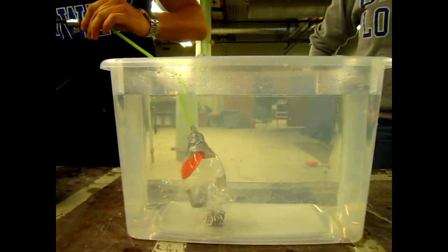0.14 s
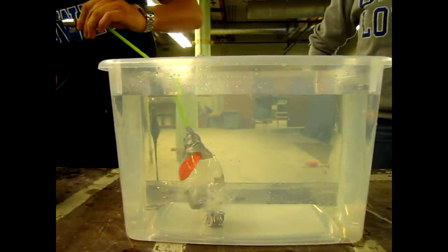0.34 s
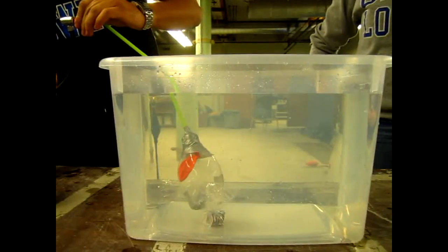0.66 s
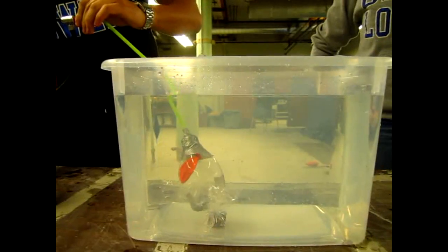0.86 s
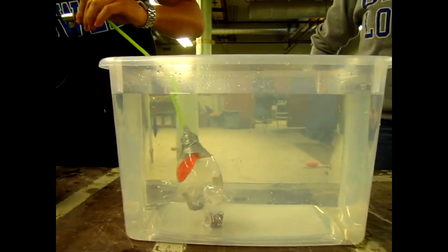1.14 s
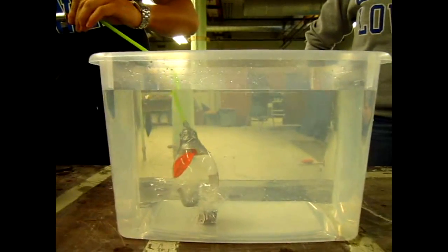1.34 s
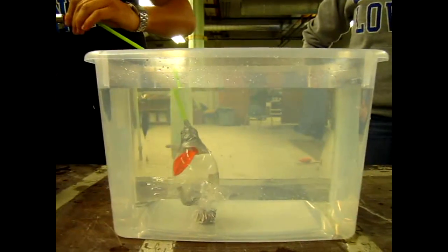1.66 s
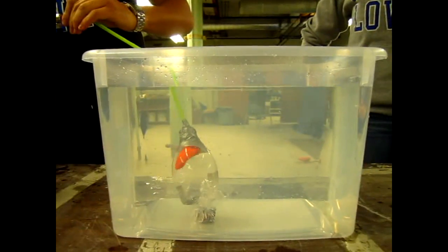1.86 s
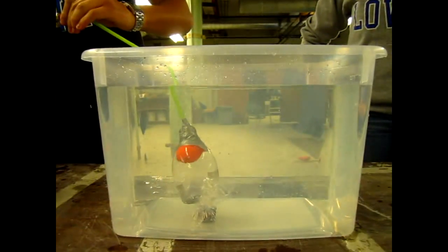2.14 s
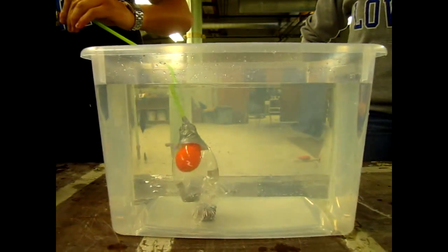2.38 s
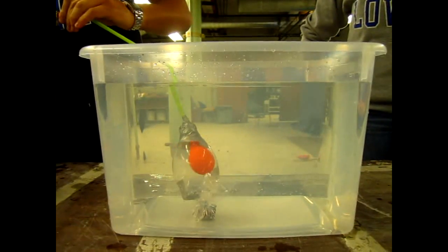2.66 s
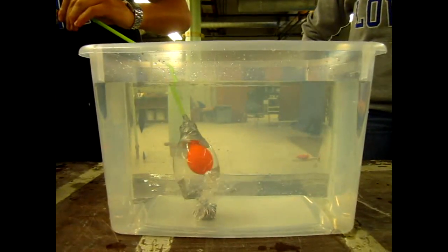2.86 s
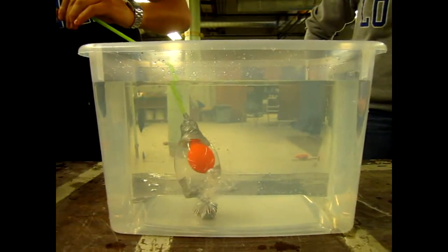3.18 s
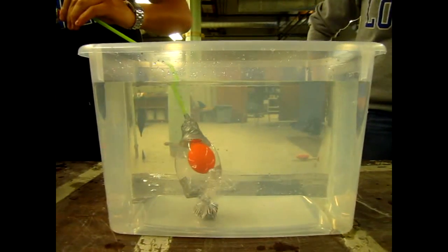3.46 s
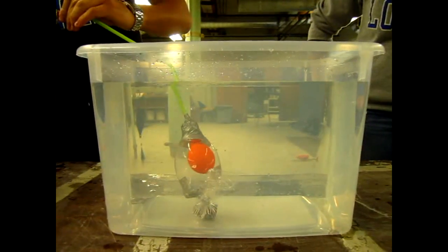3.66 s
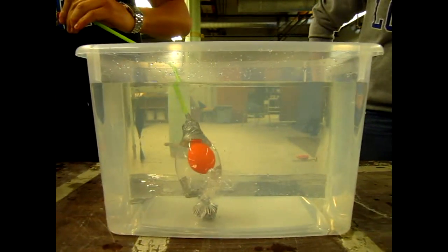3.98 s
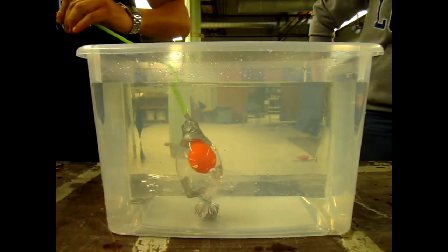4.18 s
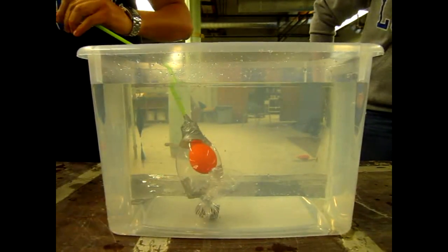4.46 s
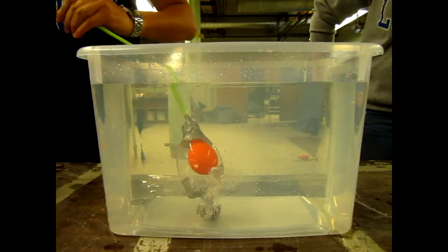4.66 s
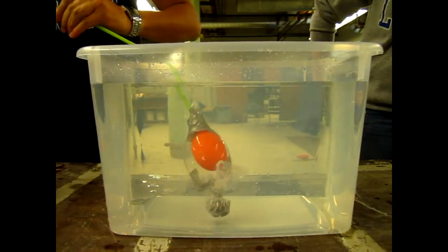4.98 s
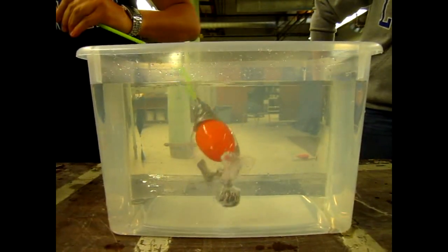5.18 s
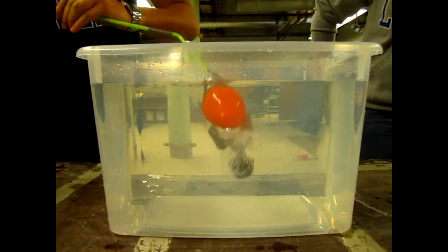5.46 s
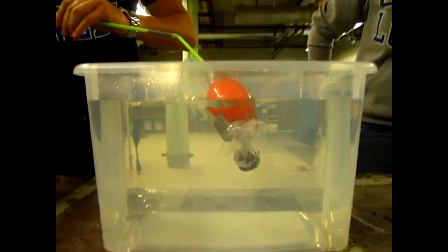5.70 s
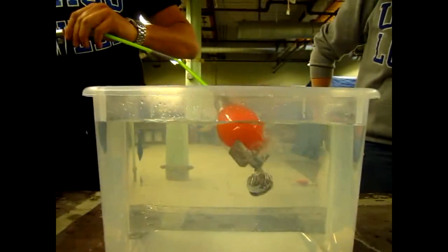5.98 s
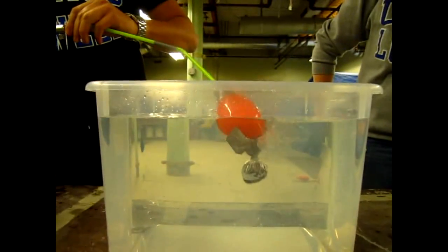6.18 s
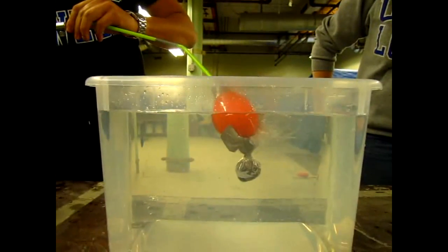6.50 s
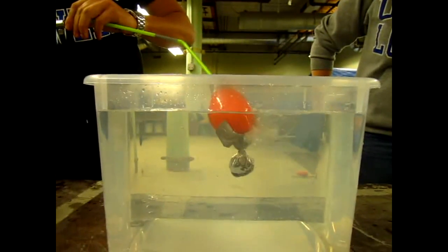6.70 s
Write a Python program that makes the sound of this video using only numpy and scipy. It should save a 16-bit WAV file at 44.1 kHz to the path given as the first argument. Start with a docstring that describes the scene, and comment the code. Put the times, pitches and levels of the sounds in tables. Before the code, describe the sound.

Indoors in a workroom, quiet low ventilation rumble with a faint wavering hum fills the first 1.6 seconds, with a barely audible touch of a switch near 1.46. At 1.67 a sharp, dry snap starts a small piston air compressor close by. It jumps at once to full loudness, its first strokes slightly harder with a short low groan, and settles by about 1.9 into a rapid hammering drone, roughly 48 strokes a second. The tone is harsh and metallic: hollow housing knocks, rattling parts, buzzing hum and bright bursts of valve hiss. A rough flutter comes from alternating strong and weak knocks, with small wavers in pitch and effort, dipping around 3.5 and easing slightly near 6.1. At 6.46 power cuts; the strokes slow and weaken, with separate clacks between 6.5 and 6.65. It stops by 6.75, leaving a short diffuse echo over ventilation.

```python
"""In a workroom a small piston air compressor is switched on, pumps for about five seconds and runs down.
Each turn of the crank excites housing modes (knock), turbulent air (valve hiss) and loose parts (rattle);
the machine rocks on its feet, so knocks come strong and weak. Multiples of the turn rate form a hum.
Switch and last slow strokes click as decaying noise bursts; diffuse echoes follow these sounds.
Ventilation rumbles behind as coloured noise with a few wavering tones."""
import sys
import numpy as np
from scipy import signal
from scipy.fft import rfft, irfft
from scipy.io import wavfile
from scipy.ndimage import uniform_filter1d

SR = 44100
rng = np.random.default_rng(int(sys.argv[2]) if len(sys.argv) > 2 else 0)


def wav_out(sig):
    """Save sig, one row per channel (or a flat mono array), as 16-bit PCM at SR to the path in sys.argv[1]."""
    wavfile.write(sys.argv[1], SR, np.round(np.clip(np.atleast_2d(sig).T, -1, 1) * 32767).astype(np.int16))


N = 301644
T = np.arange(N) / SR  # time, s
ON_S, OFF_S, REST_S = 1.671, 6.462, 6.75  # power on, power off, crank at rest
CRUISE_HZ = 48.37  # reference turn rate
STOP_S = 0.11  # length of the change to unpowered strokes, and of the final fade
ATTACK_S, SURGE_S = 0.034, 0.13  # onset under power; length of the starting surge

# narrow resonances of cylinder head and fittings: f/Hz, width/Hz, level/dB
HEAD_MODES = [(464, 49, -6), (876, 266, 2.5), (1193, 126, 5), (1593, 17, 9.5), (1922, 310, 1),
              (2040, 72, 4.5), (2714, 200, 4), (2800, 320, 8.5), (3257, 303, 8), (4060, 156, 7),
              (4266, 110, 5.5), (5936, 74, 4), (7010, 250, -2.5), (7420, 175, -1.5), (7600, 360, -16),
              (8650, 110, -2), (8900, 170, -14), (9890, 240, 2), (10800, 90, 3.5)]


def compressor():
    """Periodic excitation: all impacts, air bursts and hum are locked to the crank angle."""
    speed, phase = crank()
    work, air = load(speed)
    turns = np.flatnonzero(np.diff(np.floor(phase)) > 0)  # sample at which each turn begins
    current_turn = np.maximum(np.searchsorted(turns, np.arange(N), side="right") - 1, 0)
    chance = rng.standard_normal((len(turns), 2))
    scatter_db = 0.7 * chance[:, 0]
    force = undb(rocking(speed, phase)[turns] + scatter_db)
    blows = piston(force, turns, lag_s=.0001)
    # without power the blows soften, but the slow strokes jolt the casing harder
    coasting = ramp(OFF_S, STOP_S)
    body = undb(-3.5 - 6 * coasting) * knock(blows, rebound_s=.0022)
    panel = casing(blows * undb(5.3 * coasting))
    metal = work * (clatter(phase, force[current_turn]) + return_rattle(phase))
    metal += air * (valve_hiss(phase, hiss_db=chance[current_turn, 1]) + leak())
    return metal + ring(metal, HEAD_MODES) + panel + work * (body + hum(phase, speed))


# turn rate of the motor under power: t/s, f/Hz
MOTOR_SPEED = [(1.7, 43.91), (1.82, 49.42), (2.19, 48.51), (2.34, 49.61), (2.53, 48.49), (3.08, 48.91),
               (3.5, 48.57), (3.58, 47.03), (3.81, 48.52), (4.51, 48.64), (4.6, 47.6), (4.83, 47.94),
               (5.09, 47.17), (5.35, 48.23), (5.95, 48.04), (6.47, 48.29)]
COAST_S = .14  # time constant of the run-down


def crank():
    """Rotational kinematics: angle (turns) integrates speed (Hz), which decays exponentially once unpowered."""
    speed = curve(MOTOR_SPEED) * np.exp(-np.maximum(T - OFF_S, 0) / COAST_S) * (T < REST_S)
    phase = np.cumsum(speed) / SR
    start = int(MOTOR_SPEED[0][0] * SR)
    return speed, phase + .9 - phase[start]  # 0.9 turn at the first row of the table


# how hard the pump works against the air line: t/s, level/dB
PUMP_EFFORT = [(2.0, -0.2), (3.0, 0.7), (3.47, -1.8), (3.75, 1.5), (3.92, -0.1), (4.75, 1), (6.1, -2.4),
               (6.3, -0.9)]
STROKE_DB, AIR_DB = -19.5, -29.5  # base levels, before effort and surge
AIR_PER_EFFORT = 1.3  # dB of air per dB of effort
SURGE_DB, AIR_SURGE_DB, SURGE_FALL_S = 3, 3, 0.029
STROKE_POWER, AIR_POWER = 1.23, 1.75  # exponents of relative speed
UNPOWERED_DB, UNPOWERED_AIR_DB = 1, -4.5


def load(speed):
    """Power-law scaling: stroke and air amplitudes follow powers of relative speed, and the pump's effort."""
    running = ramp(ON_S, ATTACK_S) * (1 - ramp(REST_S - STOP_S / 2, STOP_S))
    # the starting current drives the first strokes harder
    surge = 1 - ramp(ON_S + SURGE_S, SURGE_FALL_S)
    unpowered = ramp(OFF_S, STOP_S)
    effort = curve(PUMP_EFFORT)
    pace = np.maximum(speed / curve(MOTOR_SPEED), .1)
    work_db = STROKE_DB + effort + SURGE_DB * surge + UNPOWERED_DB * unpowered
    air_db = AIR_DB + AIR_PER_EFFORT * effort + AIR_SURGE_DB * surge + UNPOWERED_AIR_DB * unpowered
    work = running * undb(work_db) * pace ** STROKE_POWER
    air = running * undb(air_db) * pace ** AIR_POWER
    return work, air * ramp(ON_S, length_s=0.067)  # the valve hisses only once there is pressure


ROCKS_PER_TURN, FIRM_S = 3 / 11, 4.334  # at FIRM_S it sits firmest
ROCK_DB, ROCK_DB_PER_HZ = 2.5, 1  # depth at cruise; growth with speed


def rocking(speed, phase):
    """Subharmonic modulation: rocking three times in eleven turns, the machine sits firm or loose (dB)."""
    depth = np.maximum(ROCK_DB + ROCK_DB_PER_HZ * (speed - CRUISE_HZ), 0)
    cycles = ROCKS_PER_TURN * (phase - np.interp(FIRM_S, T, phase))
    return depth * np.tanh(2 * np.cos(2 * np.pi * cycles))


def piston(force, turns, lag_s):
    """Impulse excitation: one blow per turn, with slight random jitter in time."""
    blows = np.zeros(N)
    late = SR * (lag_s + .00006 * rng.standard_normal(len(turns)))
    blows[np.clip(turns + late.astype(int), 0, N - 1)] = force
    return blows


# housing modes rung by the piston: f/Hz, width/Hz, level/dB
HOUSING_MODES = [(412, 198, -2), (465, 160, 6), (811, 170, 4.5), (1110, 210, -16.5)]
FIRM_BRIGHT = 1  # growth of the force exponent per octave above the second mode


def knock(blows, rebound_s):
    """Coupled resonance: blow and rebound pass through block and housing, so modes swell before they die."""
    out = 0
    for hz, width, db in HOUSING_MODES:
        # the firmer the blow, the more it favours the upper modes
        octaves = np.log2(hz / HOUSING_MODES[1][0])
        push = blows ** max(1 + FIRM_BRIGHT * octaves, .5)
        drive = push + .8 * np.interp(T - rebound_s, T, push)
        block = ring(drive, [(hz, width, 0)])
        housing = ring(block, [(hz, width, 0)])
        out = out + undb(db) * unit(housing)
    return unit(out)


# two close, lightly damped panel modes of the casing: f/Hz, width/Hz, level/dB
CASING_MODES = [(533, 5, -6), (517, 5.5, 0)]


def casing(blows):
    """Beating: two neighbouring modes, rung together by the blows, drift in and out of phase."""
    return undb(-36) * unit(ring(blows * (T > ON_S), CASING_MODES))


# spectrum of the parts that clatter with the blow: f/Hz, level/dB
CLATTER_SPECTRUM = [(150, -33), (300, -5.5), (420, 2.5), (700, -0.5), (1000, 0), (1400, -4.5), (2400, -11),
                    (3300, -14.5), (5000, -16.5), (8000, -15.5), (11000, -24.5), (14500, -40)]


def clatter(phase, force):
    """Impact noise: a steady bed of tiny impacts, plus a burst each turn that grows as the root of the force."""
    envelope = np.sqrt(force) * stroke(phase, start=.003, rise=0.096, fall=0.19) + 0.8
    impacts = grit(phase, repeat=0.092, spiky_db=1.8) * envelope
    return undb(-13.0) * colour(impacts, CLATTER_SPECTRUM)


# spectrum of the parts that rattle on the return stroke: f/Hz, level/dB
RETURN_SPECTRUM = [(300, -18.5), (600, 18.5), (1000, 11.5), (1400, 3), (2400, 5.5), (3300, -3), (4400, -3),
                   (5400, -5), (8000, -9), (14500, -16.5)]


def return_rattle(phase):
    """Impact noise: parts rattle on the way back, from just over half a turn after the blow."""
    impacts = grit(phase, repeat=0.18, spiky_db=3) * stroke(phase, start=0.55, rise=0.11, fall=0.31)
    return undb(-13.5) * colour(impacts, RETURN_SPECTRUM)


# spectrum of the air through the valve: f/Hz, level/dB
VALVE_SPECTRUM = [(300, -37), (900, -3.5), (1800, 5.5), (3000, -11.5), (5000, -12), (6200, -1.5), (7800, 3),
                  (10300, -3.5), (12000, -5.5), (14500, -28)]


def valve_hiss(phase, hiss_db):
    """Turbulent jet noise: the valve opens once a turn, and each burst of air differs in level."""
    opening = stroke(phase, start=0.24, rise=0.13, fall=0.37) * undb(hiss_db)
    jet = grit(phase, repeat=0.21, spiky_db=10) * opening
    return undb(-5.5) * colour(jet, VALVE_SPECTRUM)


# spectrum of the air that leaks all the time: f/Hz, level/dB
LEAK_SPECTRUM = [(1000, 6.5), (4000, 1.5), (8000, -3), (11000, 0), (14500, -5.5)]


def leak():
    """Stationary flow noise: leaking air is broadband noise with a fixed spectrum."""
    return undb(-7.5) * colour(noise(), LEAK_SPECTRUM)


# hum of the shaft; standing waves make each multiple swell or fade with speed:
# multiple of the turn rate, level/dB, slope/(dB per Hz)
HUM_ORDERS = [(1, -35.5, 2), (2, -27.5, 4.5), (3, -33.5, 2), (4, -29, -2.5), (5, -18.5, -1), (6, -50, 25),
              (7, -24.5, 5), (8, -23.5, -3.5), (9, -9, 4.5), (10, -17.5, 9), (11, -20, -7)]


def hum(phase, speed):
    """Harmonic series: multiples of the turn rate build up as the motor takes hold, with a brief low groan."""
    faster = np.clip(speed - CRUISE_HZ, -2, 1)
    powered = ramp(ON_S, length_s=0.2) * (1 - ramp(OFF_S, length_s=0.079))
    out = 0
    for order, db, slope in HUM_ORDERS:
        level = undb(db + slope * faster + 0.9 * walk(1.93))
        # phases spread so the lines do not pile up into a click
        out = out + level * np.sin(2 * np.pi * order * phase + order ** 2)
    groan_gate = ramp(ON_S, ATTACK_S) * (1 - ramp(ON_S + SURGE_S, length_s=0.082))
    groan = groan_gate * unit(ring(noise(), [(141, 36, 0)]))
    return np.sqrt(2) * out * powered + undb(-18) * groan


# the switch is touched, then snaps shut: t/s, level/dB, decay/s
SWITCH_CLICKS = [(1.464, -39.5, .005), (1.6706, -3.5, 0.0072)]
# clacks of the last slow strokes: t/s, level/dB, decay/s
STROKE_CLACKS = [(6.514, -20, .003), (6.547, -18, 0.0026), (6.589, -16.5, 0.0029), (6.651, -23, 0.0013)]
# spectrum of these cracks: f/Hz, level/dB
CLICK_SPECTRUM = [(200, -11), (1000, -6), (1800, 1), (2900, 4.5), (4000, -5), (5200, 2), (6300, -10),
                  (8000, -4.5), (11000, -11.5), (14500, -29)]


def clicks():
    """Transient excitation: metal on metal gives noise with sudden onset and exponential decay."""
    envelope = 0
    for start_s, db, decay_s in list(SWITCH_CLICKS) + list(STROKE_CLACKS):
        envelope = envelope + undb(db) * (T >= start_s) * np.exp(-np.abs(T - start_s) / decay_s)
    return colour(envelope * noise(), CLICK_SPECTRUM)


def room(x, t60_s, wet_db):
    """Diffuse reverberation: echoes from benches and walls form exponentially decaying noise."""
    t = T[:SR // 2]
    tail = rng.standard_normal(len(t)) * undb(-60 * t / t60_s) * (t > .006)
    band = signal.butter(2, [700, 9000], "band", fs=SR, output="sos")
    tail = signal.sosfilt(band, tail / np.linalg.norm(tail))
    return x + undb(wet_db) * signal.fftconvolve(x, tail)[:N]


# spectral density of the ventilation: f/Hz, level/dB (per Hz)
VENT_SPECTRUM = [(15, -18), (25, -8), (63, -17), (92, -12.5), (161, -9), (205, -14.5), (247, -11.5),
                 (594, -21), (818, -22.5), (934, -26), (1630, -29), (2310, -33), (2640, -35), (13000, -44),
                 (14500, -42)]
# tones of the ventilation: f/Hz, level/dB
VENT_TONES = [(59.2, -49), (161.5, -53.5), (850.6, -64), (1610, -67)]


def ventilation():
    """Stationary noise with tonal components: a steady rumble and lines that waver in pitch and level."""
    lines = 0
    for hz, db in VENT_TONES:
        angle = 2 * np.pi * np.cumsum(hz + 2 * walk(10.0)) / SR
        lines = lines + undb(db + 2 * walk(1.3)) * np.sin(angle)
    return undb(-45) * unit(colour(noise(), VENT_SPECTRUM)) + lines


def stroke(phase, start, rise, fall):
    """Cyclic envelope: once a turn it swells from a starting angle and dies away (all in turns)."""
    age = (phase - start) % 1
    return unit((1 - np.exp(-(age / rise) ** 2)) * np.exp(-age / fall))


def grit(phase, repeat, spiky_db, size=912):
    """Cyclostationary noise: dense tiny impacts, a share of whose power recurs at the same moment each turn."""
    index = np.arange(N)
    new_turn = np.diff(np.floor(phase), prepend=0) > 0
    last_turn = np.maximum.accumulate(index * new_turn)
    pattern = unit(irfft(np.exp(2j * np.pi * rng.random(size // 2 + 1))))
    fresh = unit(noise() * undb(spiky_db * np.minimum(noise(), 2)))
    recurring = pattern[(index - last_turn) % size]
    return np.sqrt(repeat) * recurring + np.sqrt(1 - repeat) * fresh


def ring(x, modes):
    """Modal superposition: parallel resonances (f/Hz, width/Hz, level/dB)."""
    out = 0
    for hz, width, db in modes:
        b, a = signal.iirpeak(hz, hz / width, SR)
        out = out + undb(db) * signal.lfilter(b, a, x)
    return out


def colour(x, points, size=4096):
    """Minimum-phase filtering: causal filter of unit power through (f/Hz, level/dB) points."""
    hz, db = np.transpose(points)
    f = np.maximum(np.arange(size // 2 + 1) * SR / size, 1)
    cepstrum = irfft(np.log(undb(np.interp(np.log(f), np.log(hz), db))))
    # folding the cepstrum onto positive times makes the filter causal
    cepstrum[1:size // 2] *= 2
    cepstrum[size // 2 + 1:] = 0
    response = irfft(np.exp(rfft(cepstrum)))
    return signal.fftconvolve(x, response / np.linalg.norm(response))[:N]


def noise():
    """White noise: equal power at all frequencies."""
    return rng.standard_normal(N)


def walk(rate):
    """Low-pass random fluctuation: smoothed random steps at a rate in Hz, scaled to rms 1."""
    k = int(SR / rate)
    steps = np.repeat(rng.standard_normal(N // k + 1), k)
    return unit(uniform_filter1d(steps, k)[:N])


def curve(rows, axis=1):
    """Linear interpolation: one column of a table, joined by straight lines in time."""
    rows = np.array(rows)
    return np.interp(T, rows[:, 0], rows[:, axis])


def ramp(start_s, length_s):
    """Linear onset: rises from 0 to 1 in a straight line."""
    return np.clip((T - start_s) / length_s, 0, 1)


def undb(db):
    """Logarithmic level: decibels to amplitude gain."""
    return 10 ** (np.asarray(db) / 20)


def unit(x):
    """Power normalisation: scale to rms 1."""
    return x / np.sqrt(np.mean(x ** 2))


def gain_control(x, threshold_db, slope, release_db):
    """Dynamic compression: smoothed power above threshold lowers the gain, which recovers over time."""
    power = signal.lfilter(*signal.butter(1, 6, fs=SR), x ** 2)
    level_db = 10 * np.log10(power + 1e-12)
    # a held peak that falls by at most release_db each second
    held_db = np.maximum.accumulate(level_db + release_db * T, axis=-1) - release_db * T
    return x * undb(-slope * np.maximum(held_db - threshold_db, 0))


def scene():
    """Linear superposition: the machine and its clicks with their echoes, over the ventilation."""
    machine = undb(7.5) * compressor() + clicks()
    return (room(machine, t60_s=0.77, wet_db=-13.5) + ventilation())[None]


TOP_HZ = 14450  # upper band limit


def record(dry):
    """Compression, clipping, band limiting: loud sound is turned down, sharp peaks clipped, the top cut."""
    held = gain_control(dry, threshold_db=-26.5, slope=0.48, release_db=18.5)
    clipped = np.clip(held, -.8, .8)
    return signal.sosfilt(signal.ellip(10, .2, 80, TOP_HZ, fs=SR, output="sos"), clipped)


dry = scene()
out = record(dry)
wav_out(out)
```